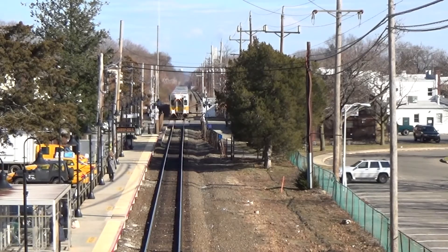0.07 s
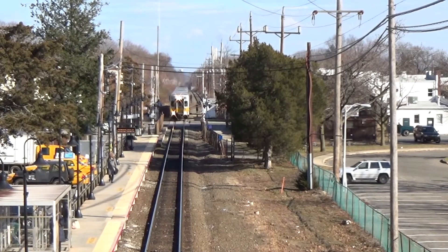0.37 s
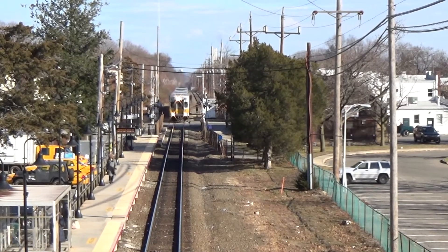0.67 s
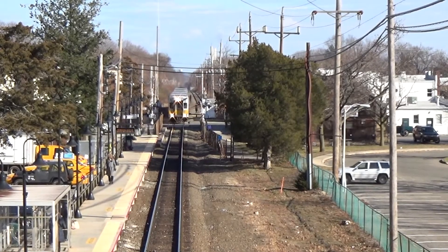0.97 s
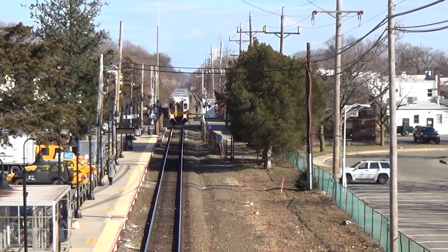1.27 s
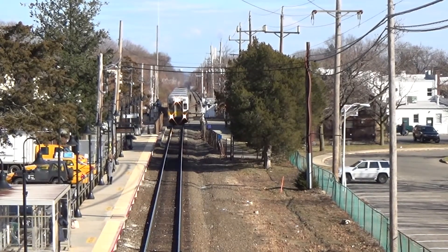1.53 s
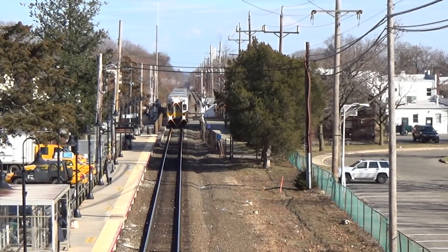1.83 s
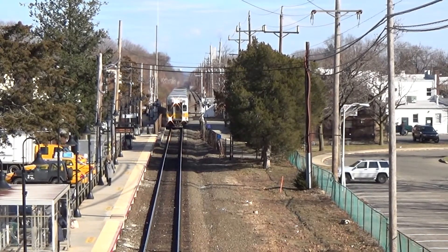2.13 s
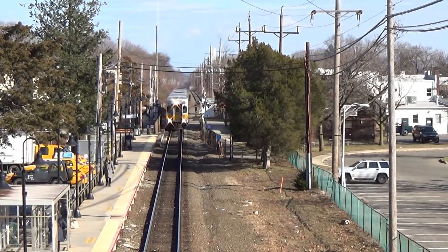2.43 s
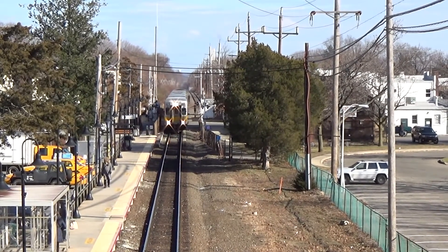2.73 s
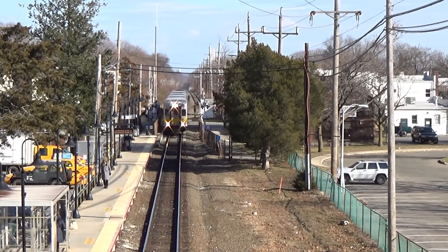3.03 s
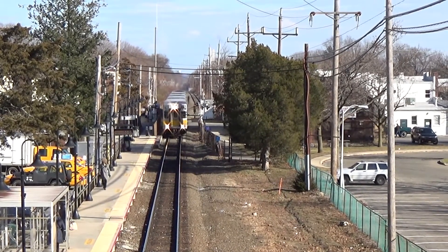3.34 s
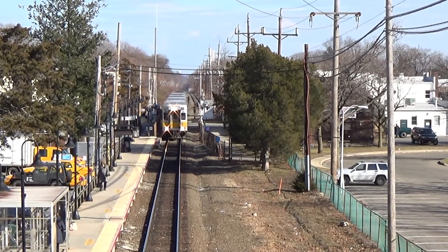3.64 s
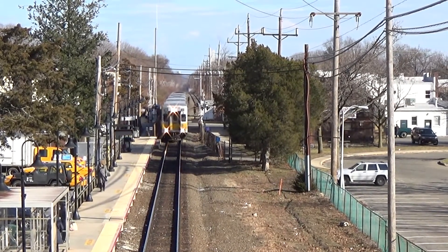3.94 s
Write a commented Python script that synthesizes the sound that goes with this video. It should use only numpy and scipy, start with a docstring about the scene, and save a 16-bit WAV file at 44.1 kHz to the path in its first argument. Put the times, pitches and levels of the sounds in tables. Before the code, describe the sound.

A distant train horn sounds one long blast, then echoes away over a soft rumble.

```python
"""A distant train runs towards a station, already sounding one long blast on a two-note air horn.
Under it lie a wash of wheels and traffic, a low engine hum and a faint high hiss; dry rustles and
soft wind buffets come close by. The horn shuts off at 1.2 s. Trees and buildings throw it back late,
dull and flattened in pitch, as the train moves away from many of them. Then the wash loses treble,
the wheels sing faintly as they approach, and a thin whine enters at 2.9 s."""
import sys
import numpy as np
from scipy import signal
from scipy.fft import rfft, irfft
from scipy.io import wavfile

SR = 44100
rng = np.random.default_rng(int(sys.argv[2]) if len(sys.argv) > 2 else 0)


def generate_wav(signal):
    """Clip the signal to [-1, 1] and save it as 16-bit WAV at the path in sys.argv[1]."""
    frames = np.transpose(np.atleast_2d(signal))
    scaled = np.clip(frames, -1, 1) * 32767
    pcm = np.round(scaled).astype(np.int16)
    wavfile.write(sys.argv[1], SR, pcm)


N = 176400


def from_db(db):
    """Decibels to gain."""
    return 10 ** (np.asarray(db) / 20)


def rms_one(x):
    """Scale to unit power."""
    return x / np.sqrt(np.mean(x ** 2) + 1e-20)


def curve(rows, at):
    """Interpolate each column of a table against the first."""
    key, *columns = np.transpose(rows)
    return [np.interp(at, key, column) for column in columns]


def at_hz(points, hz):
    """Read a spectrum on a log-frequency axis."""
    freqs, values = np.transpose(points)
    return np.interp(np.log(hz), np.log(freqs), values)


def pan(db):
    """Stereo gains for a left-minus-right level."""
    return from_db(np.array([[db], [-db]]) / 2)


def bump(x, centre, half_width, power=2):
    """Bell curve of height 1; power 4 flattens the top."""
    return np.exp(-((x - centre) / half_width) ** power)


def lowpass(x, hz):
    """Second-order low-pass."""
    return signal.sosfilt(signal.butter(2, hz, fs=SR, output="sos"), x + 1e-18)


def bandpass(x, low_hz, high_hz, order=2):
    """Butterworth band-pass."""
    return signal.sosfilt(signal.butter(order, [low_hz, high_hz], "band", fs=SR, output="sos"), x)


def drift(rate_hz, size=N):
    """Smooth random wander of spread 1."""
    hop, settle = 40, 2000
    pole = np.exp(-2 * np.pi * hop * rate_hz / SR)
    white = rng.standard_normal(size // hop + settle + 2)
    slow = signal.lfilter([1], [1, -2 * pole, pole * pole], white)[settle:]
    return np.interp(np.arange(size) / hop, np.arange(len(slow)), rms_one(slow))


# Left-right likeness of noise: (frequency [Hz], correlation [ratio])
STEREO_CORRELATION = [(30, .6), (90, 0.91), (250, 1), (800, 0.85), (2500, 0.57), (5000, 0.65), (12000, 1)]


def banded_noise(spectrum, flicker_db):
    """Unit-power stereo noise; each band has its own level, flicker and width."""
    out, edges_hz = 0, np.geomspace(22, 17000, 25)
    white = rng.standard_normal((2, 2, N))
    for k, (low, high) in enumerate(zip(edges_hz, edges_hz[1:])):
        mid, side = bandpass(white[k % 2], low, high)
        hz = np.sqrt(low * high)
        alike = at_hz(STEREO_CORRELATION, hz)
        gain = from_db(at_hz(spectrum, hz) + flicker_db * drift(2.4))
        out = out + gain * (np.sqrt(1 + alike) * mid + np.sqrt(1 - alike) * side * [[1], [-1]])
    return rms_one(out)


START_S, MIDDLE_S, STOP_S, ATTACK_S, RELEASE_S = -0.25, 0.63, 1.185, 0.26, 0.049


def valve(t):
    """Air pressure, 0 to 1: opened, held, shut."""
    opening = np.clip((t - START_S) / ATTACK_S, 0, 1)
    return opening * np.exp(-np.maximum(t - STOP_S, 0) / RELEASE_S)


# Reed tuning as the pressure settles: (time [s], offset [cents])
REED_PITCH = [(0, 16), (.1, 3), (.3, 0), (.8, 1), (1.0, -2), (1.2, -3.5)]
LOW_HZ, HIGH_HZ, JITTER_CENTS = 322.7, 447.6, 2.166


def reed_phase(t, hz):
    """Running phase of a reed whose pitch settles and trembles."""
    cents = curve(REED_PITCH, t)[0] + JITTER_CENTS * drift(20.4, len(t))
    return 2 * np.pi * np.cumsum(hz * 2 ** (cents / 1200)) / SR


def flutter(t, hz=24.5, depth_rad=0.18, wander_rad=0.5):
    """Quick, uneven phase swing of the low reed; roughens its overtones."""
    return depth_rad * np.sin(2 * np.pi * hz * t + wander_rad * drift(2.04, len(t)))


# Loudness through moving air: (time [s], body gain [dB], treble gain [dB])
AIR_CARRY = [(0, 2, -4.5), (.07, -1, -5.5), (.2, 2.5, -2.5), (.4, 0.5, -2.5), (.5, 0.5, -1),
             (.62, -0.5, -3), (.69, 2.5, -0.5), (.82, 2, -1), (.86, 0, 1), (.9, -1.5, 1), (.95, 3, -1),
             (1.04, 3, 2), (1.18, 1, 1.5)]
BODY_HZ, TREBLE_HZ = 1440, 4700


def treble_share(hz):
    """0 in the horn's body, 1 in its treble."""
    return np.clip((hz - BODY_HZ) / (TREBLE_HZ - BODY_HZ), 0, 1)


def partial_envelope(t, hz):
    """A partial follows the valve and the moving air; high ones die first."""
    body_db, treble_db = curve(AIR_CARRY, t)
    treble = treble_share(hz)
    return from_db((1 - treble) * body_db + treble * treble_db) * valve(t) ** (1 + 3 * treble)


# Horn spectra, interpolated: (harmonic [multiple], base level at MIDDLE_S [dB], swell [dB/s])
LOW_PARTIALS = [(1.01, -40, 3.5), (2.11, -30, 10), (2.95, -30.5, 3), (4.1, -31.5, -1.5), (5.16, -40.5, 2.5),
                (6.05, -38.5, -4.5), (6.7, -43, -7), (8.16, -45.5, -8), (9, -55, -6.5), (10.9, -52.5, 1),
                (13.8, -80, 13), (16, -72.5, 12.5), (17.8, -82, 11), (22.3, -76, 8), (34, -93, 1)]
HIGH_PARTIALS = [(1.03, -33.5, 3.5), (2, -31, 0), (2.9, -31.5, 10.5), (3.87, -34, 2), (5.1, -37.5, 3.5),
                 (5.82, -38.5, -2), (7.05, -51, -2), (7.75, -48, -3.5), (8.96, -59.5, 2.5),
                 (9.84, -57, 2.5), (11.9, -66.5, 0), (13, -65.5, 1), (14.9, -72.5, 4.5), (18.5, -75.5, 2.5),
                 (25.8, -81, 4)]


def horn(t, hz, phase, partials, fade_db=1.6):
    """One reed horn; each harmonic fades and scatters in the air."""
    n, out = len(t), 0
    for k in range(1, int(12000 / hz)):
        base_db, swell = curve(partials, k)
        db = base_db + swell * (t - MIDDLE_S) + fade_db * drift(2.8, n)
        scatter_hz = 3.8 * np.sqrt(k * hz / BODY_HZ)
        depth = 0.2 * (1 + 2.55 * treble_share(k * hz))
        scatter = depth * (drift(scatter_hz, n) + 1j * drift(scatter_hz, n))
        tone = np.exp(1j * (k * phase + 2 * np.pi * rng.random()))
        out = out + from_db(db) * partial_envelope(t, k * hz) * (1 + scatter) * tone
    return np.sqrt(2) * out.real


# Air noise of the horn: (frequency [Hz], relative density [dB])
RUSH_SPECTRUM = [(150, -25), (300, -1), (650, 8.5), (1300, 3.5), (1900, -6.5), (2600, -7), (3600, -2.5),
                 (5000, -25.5), (8000, -29.5), (12000, -51)]


def air_rush(t, base_db=-35.5):
    """Air rushes through the horn while the valve is open."""
    _, treble_db = curve(AIR_CARRY, t)
    noise = banded_noise(RUSH_SPECTRUM, flicker_db=1)[0, :len(t)]
    return from_db(base_db + 1.5 * treble_db) * valve(t) ** 2 * noise


# Side tones of each high-horn partial: (offset [multiples of the low note], gain [dB])
SIDE_ORDERS = [(-1, -3), (1, -9.5), (2, 1), (3, -3)]
# Side-tone spectrum: (frequency [Hz], base level [dB])
SIDE_LEVELS = [(1090, -46.5), (1500, -48), (1900, -43.5), (2350, -57.5), (3300, -55.5), (4600, -66.5),
               (6000, -71.5), (8500, -74)]


def side_tones(t, low_phase, high_phase, swell_db_per_s=5.5):
    """The reeds intermodulate; sum and difference tones make the chord brassy."""
    out, swell_db = 0, swell_db_per_s * (t - MIDDLE_S)
    for m, order_db in SIDE_ORDERS:
        for k in range(1, 19):
            hz = k * HIGH_HZ + m * LOW_HZ
            if hz > 3.3 * LOW_HZ:
                tone = np.cos(k * high_phase + m * low_phase + 2 * np.pi * rng.random())
                db = at_hz(SIDE_LEVELS, hz) + order_db + swell_db + 2 * drift(5.8, len(t))
                out = out + from_db(db) * partial_envelope(t, hz) * tone
    return np.sqrt(2) * out


def horn_blast(t):
    """Both notes, their rush of air and their side tones."""
    low_phase = reed_phase(t, LOW_HZ) + flutter(t)
    high_phase = reed_phase(t, HIGH_HZ)
    chord = horn(t, LOW_HZ, low_phase, LOW_PARTIALS) + horn(t, HIGH_HZ, high_phase, HIGH_PARTIALS)
    return chord + air_rush(t) + side_tones(t, low_phase, high_phase)


# Fades and flares: (time [s], half-width [s], centre [Hz], half-width [Hz], gain [dB])
BAND_FADES = [(0.076, 0.079, 895, 40, -6.5), (.12, 0.097, 385, 90, -9.5), (0.21, 0.14, 645, 29, -12),
              (0.885, .03, 895, 40, -15), (1.09, 0.085, 895, 28, -11), (1, 0.15, 370, 100, -11.5),
              (1.085, 0.083, 2650, 78, 7), (1.09, 0.075, 5600, 560, 6.5)]


def fading(t, x):
    """Paths through moving air briefly cancel or reinforce single bands."""
    spectrum, freqs = rfft(x, 2 * N), np.fft.rfftfreq(2 * N, 1 / SR)
    for time_s, width_s, hz, width_hz, db in BAND_FADES:
        band = irfft(spectrum * bump(freqs, hz, width_hz, power=4))[:N]
        x = x + (from_db(db * bump(t, time_s, width_s, power=4)) - 1) * band
    return x


# Direct path: (frequency [Hz], gain [dB], left lag [rad], left minus right [dB])
GROUND_RESPONSE = [(320, 0, .8, -1), (450, -2, .9, -1), (650, 0, .8, -1.5), (895, 6, .6, 0),
                   (955, .5, .7, .9), (1320, 0, .25, 1.8), (1620, 0, .6, 2), (1790, 3, .75, 3.5),
                   (1930, -1, .8, 3), (2240, 1, .9, 4), (2700, 1, .8, -2), (3800, 0, .1, 0)]


def ground_path(x):
    """The ground colours the direct sound; left and right differ in phase and level."""
    gain_db, lag_rad, tilt_db = curve(GROUND_RESPONSE, np.fft.rfftfreq(2 * N, 1 / SR))
    ear = np.array([[0.5], [-0.5]])
    response = from_db(gain_db + ear * tilt_db) * np.exp(-1j * ear * lag_rad)
    return irfft(rfft(x, 2 * N) * response)[:, :N]


ECHO_COUNT, ECHO_SPAN_S, ECHO_DB, ECHO_DECAY_DB_PER_S = 72, 0.9, -4.5, 23.5
ECHO_CUT_HZ, ECHO_DULLING_PER_S, ECHO_PAN_DB, ECHO_LAG_S = 2610, 1.06, 5.5, 0.00018
DOPPLER_DROP, DOPPLER_SKEW = 0.1, 2.3  # pitch fraction lost straight behind the train; most lose less


def echoes(t, horn_t, blast, flicker_db=2.5):
    """Reflectors, each with its own delay, Doppler drop and side; later ones are weaker and duller."""
    out, n = np.zeros((2, N)), int(2.7 * SR)
    draws = rng.random((ECHO_COUNT, 3))
    delays_s = ECHO_SPAN_S * (np.arange(ECHO_COUNT) + draws[:, 0]) / ECHO_COUNT
    gains = from_db(-ECHO_DECAY_DB_PER_S * delays_s)
    gains = from_db(ECHO_DB) * gains / np.linalg.norm(gains)
    golden_step = (np.sqrt(5) - 1) / 2  # spreads the bearings evenly
    bearings = (np.arange(ECHO_COUNT) * golden_step + rng.random()) % 1
    for delay_s, gain, behind, (_, side, lag) in zip(delays_s, gains, bearings, 2 * draws - 1):
        pitch_ratio = 1 - DOPPLER_DROP * behind ** DOPPLER_SKEW
        sent_s = STOP_S + (t[:n] - STOP_S - delay_s) * pitch_ratio
        ear_s = lag * ECHO_LAG_S * np.array([[0.5], [-0.5]])
        pair = np.interp(sent_s + ear_s, horn_t, blast, 0, 0)
        pair = lowpass(pair, ECHO_CUT_HZ * np.exp(-ECHO_DULLING_PER_S * delay_s))
        flicker = rms_one(from_db(flicker_db * drift(10.4, n)))
        out[:, :n] += gain * pan(ECHO_PAN_DB * side) * pair * flicker
    return out


# Reverberation of trees and buildings: (frequency [Hz], t60 [s], level [dB])
RING_BANDS = [(300, 1.9, -12), (660, 1.1, -10.5), (1300, 0.75, -9), (2316, 1.2, -0.5), (3620, 0.47, -10),
              (6000, 0.19, -11), (12000, .2, -12.5)]


def diffuse_ring(horn_t, blast, pitch_ratio=0.991, build_s=0.09):
    """Countless faint, slightly flat reflections die away band by band, the top first."""
    flattened = np.interp(STOP_S + (horn_t - STOP_S) * pitch_ratio, horn_t, blast)
    age_s = np.arange(int(1.6 * SR)) / SR
    mid, side = rng.standard_normal((2, len(age_s)))
    white = mid + 0.15 * side * [[1], [-1]]
    response, edges_hz = 0, np.geomspace(200, 14000, 10)
    for low, high in zip(edges_hz, edges_hz[1:]):
        t60_s, db = curve(RING_BANDS, np.sqrt(low * high))
        fall = from_db(-60 * age_s / t60_s) * np.minimum(age_s / build_s, 1)
        response = response + from_db(db) * bandpass(white, low, high) * fall / np.linalg.norm(fall)
    lead = int(-horn_t[0] * SR)
    wet = signal.fftconvolve(flattened[None], response, axes=1)[:, lead:]
    return np.pad(wet, ((0, 0), (0, N)))[:, :N]


# Wheels and traffic: (frequency [Hz], relative density [dB])
WASH_SPECTRUM = [(25, -29.5), (60, -24.5), (90, -17.5), (125, -15.5), (210, -7.5), (400, -7), (780, -1),
                 (1450, -7.5), (2000, -15.5), (2280, -19), (2850, -17), (4600, -38), (8000, -31.5),
                 (15500, -51)]
WASH_DB, WASH_PAN_DB, DULL_HZ, DULL_DB_PER_S, DULL_FROM_S = -44, -1.5, 1500, -2, 1.83


def traffic_wash(t):
    """Steady noise of wheels and traffic that slowly loses its treble."""
    wash = from_db(WASH_DB) * pan(WASH_PAN_DB) * banded_noise(WASH_SPECTRUM, flicker_db=0.5)
    body = signal.sosfiltfilt(signal.butter(2, DULL_HZ, fs=SR, output="sos"), wash)
    treble_gain = from_db(DULL_DB_PER_S * np.maximum(t - DULL_FROM_S, 0))
    return body + (wash - body) * treble_gain


def engine_hum(t, hz=91.5, rms_db=-68.5):
    """An engine's low, wavering tone."""
    return np.sqrt(2) * from_db(rms_db) * np.sin(2 * np.pi * hz * t + 0.77 * drift(3))


# High hiss: (frequency [Hz], relative density [dB])
HISS_SPECTRUM = [(2500, -2), (5000, -1), (8000, -2.5), (11000, -12.5), (15500, -10)]
# Wind buffets: (time [s], half-width [s], level [dB])
BUFFETS = [(.3, 0.64, -73.5), (1.07, 0.086, -62.5)]
HISS_DB, HISS_PEAK_S, HISS_DB_PER_S, BUFFET_CUT_HZ = -60, 1.5, -1.5, 72


def hiss_and_buffets(t):
    """A faint high background hiss swells and fades; soft low wind buffets hit the microphone."""
    swell = from_db(HISS_DB + HISS_DB_PER_S * np.abs(t - HISS_PEAK_S))
    hiss = banded_noise([(1000, -41)] + HISS_SPECTRUM, flicker_db=1)
    push = sum(from_db(db) * bump(t, time_s, width_s) for time_s, width_s, db in BUFFETS)
    rumble = rms_one(lowpass(rng.standard_normal(N), BUFFET_CUT_HZ))
    return swell * hiss + push * rumble


# Dry rustles and ticks: (time [s], half-width [s], level [dB], centre [Hz])
RUSTLE_PUFFS = [(.24, 0.14, -56.5, 7700), (1.493, 0.0035, -54, 5600), (2.135, .005, -56, 6800),
                (2.12, 0.15, -65, 7550), (2.33, 0.051, -62.5, 7460), (2.496, 0.0048, -60, 4500),
                (3.06, 0.012, -51, 7860), (3.11, 0.076, -62, 7400), (3.137, 0.017, -57, 3420),
                (3.14, 0.014, -60, 5750)]


def rustles(t, band_ratio=1.18):
    """Short grainy puffs of treble close by."""
    out = 0
    for time_s, width_s, db, hz in RUSTLE_PUFFS:
        grain = rng.standard_normal(N) * from_db(drift(150))
        for _ in range(2):
            grain = bandpass(grain, hz / band_ratio, hz * band_ratio, order=1)
        out = out + from_db(db) * bump(t, time_s, width_s) * rms_one(grain)
    return out


WALL_SENT_S, WALL_HEARD_S, WALL_HALF_WIDTH_S, WALL_CUT_HZ = 0.69, 1.16, 0.19, 303


def wall_echo(t, horn_t, blast, pitch_ratio=0.905, gain=1.589):
    """A low, flattened copy of the horn swells as the train passes a wall."""
    copy = np.interp(WALL_SENT_S + (t - WALL_HEARD_S) * pitch_ratio, horn_t, blast, 0, 0)
    dull = lowpass(lowpass(copy, WALL_CUT_HZ), WALL_CUT_HZ)
    return gain * bump(t, WALL_HEARD_S, WALL_HALF_WIDTH_S, power=4) * dull


def wheel_song(t, hz=796, width_hz=170, full_db=-53.5, rise_s=4.2):
    """Rolling noise in one broad wheel resonance, growing with the approach."""
    b, a = signal.iirpeak(hz, hz / width_hz, fs=SR)
    song = rms_one(signal.lfilter(b, a, signal.lfilter(b, a, rng.standard_normal(N))))
    return from_db(full_db) * (t / rise_s) ** 2 * pan(WASH_PAN_DB) * song


def whine(t, hz=5868, rms_db=-75, start_s=2.9, rise_s=0.1):
    """A thin, wavering tone late on."""
    onset = np.clip((t - start_s) / rise_s, 0, 1)
    return np.sqrt(2) * from_db(rms_db) * onset * np.sin(2 * np.pi * hz * t + drift(5.8))


def scene():
    """The horn, direct and reflected, over the sounds along the line."""
    t = np.arange(N) / SR
    horn_t = np.arange(2 * SR) / SR - 0.5  # the blast begins before time zero
    blast = horn_blast(horn_t)
    direct = ground_path(fading(t, np.interp(t, horn_t, blast, 0, 0)))
    reflected = echoes(t, horn_t, blast) + diffuse_ring(horn_t, blast) + wall_echo(t, horn_t, blast)
    background = traffic_wash(t) + engine_hum(t) + whine(t) + hiss_and_buffets(t)
    return direct + reflected + background + rustles(t) + wheel_song(t)


def record(dry):
    """3 ms fade-in, then a steep low-pass at 15.7 kHz."""
    fade_in = np.minimum(np.arange(N) / (0.003 * SR), 1)
    return signal.sosfilt(signal.ellip(10, 0.1, 80, 15700, fs=SR, output="sos"), dry * fade_in)


dry = scene()
out = record(dry)
generate_wav(out)
```